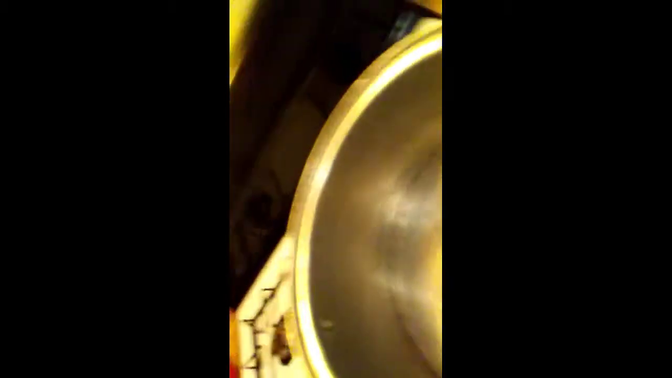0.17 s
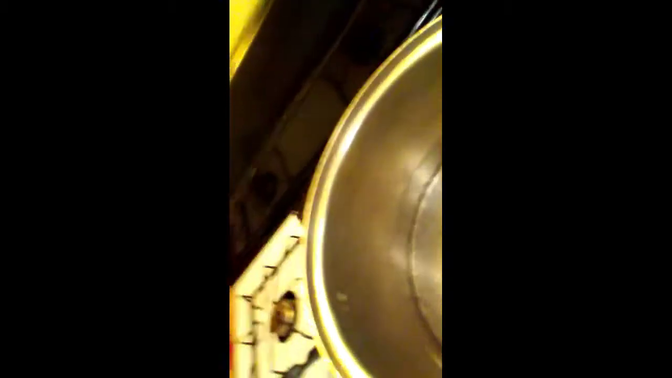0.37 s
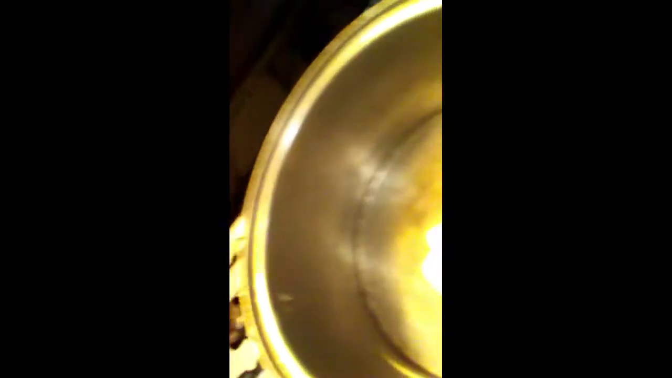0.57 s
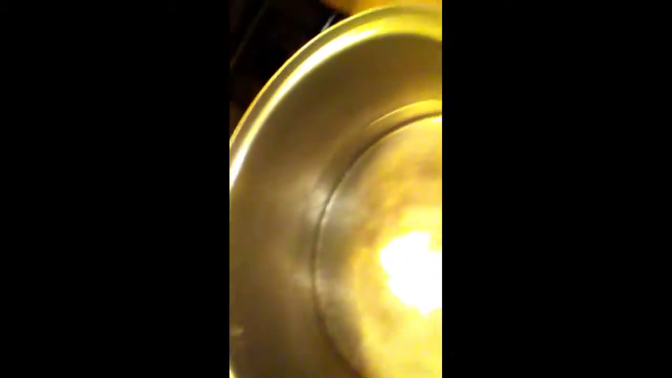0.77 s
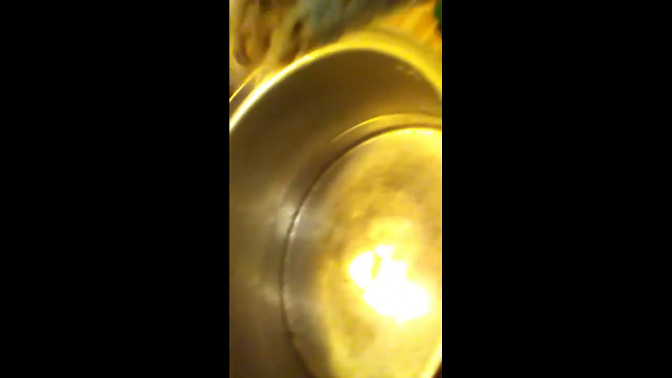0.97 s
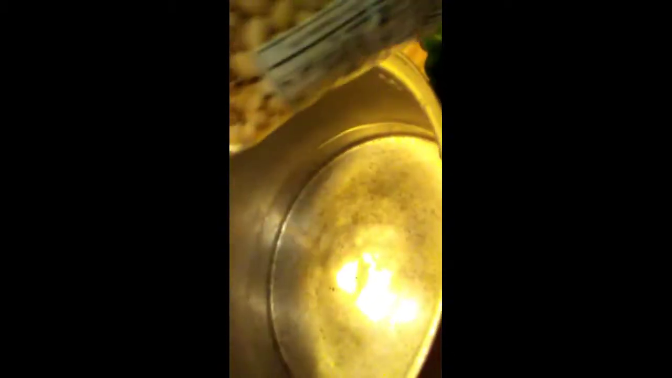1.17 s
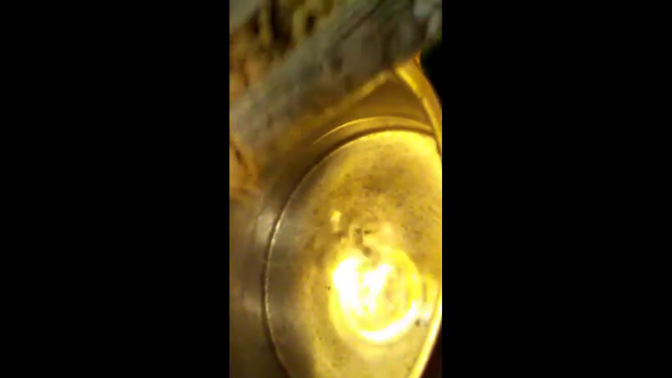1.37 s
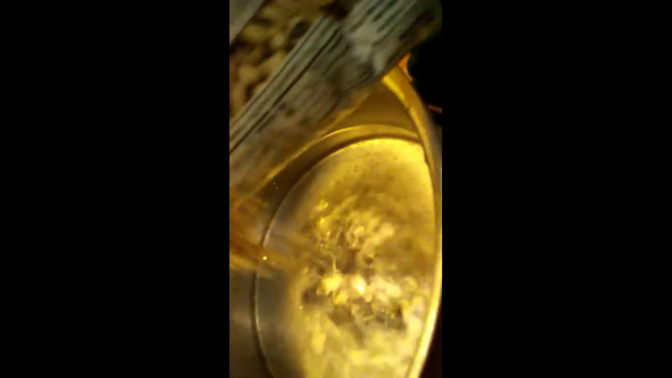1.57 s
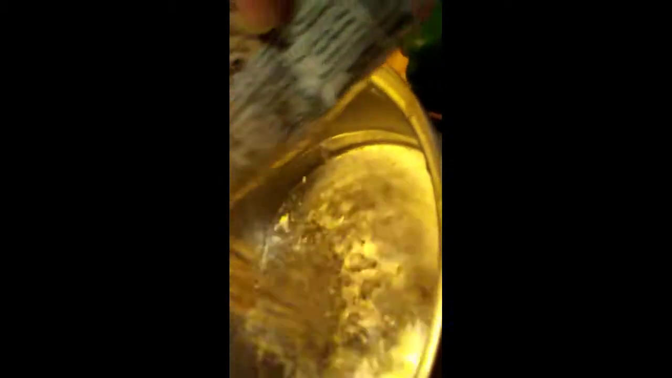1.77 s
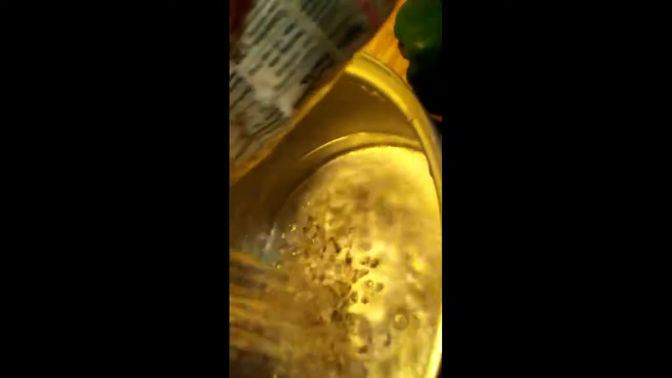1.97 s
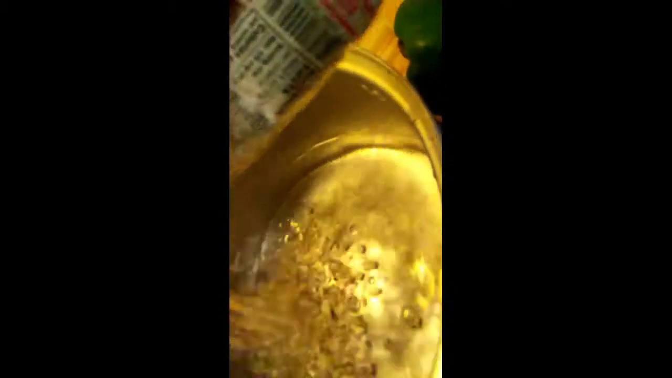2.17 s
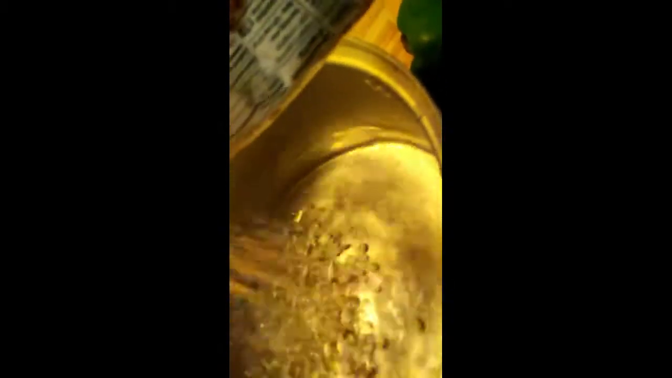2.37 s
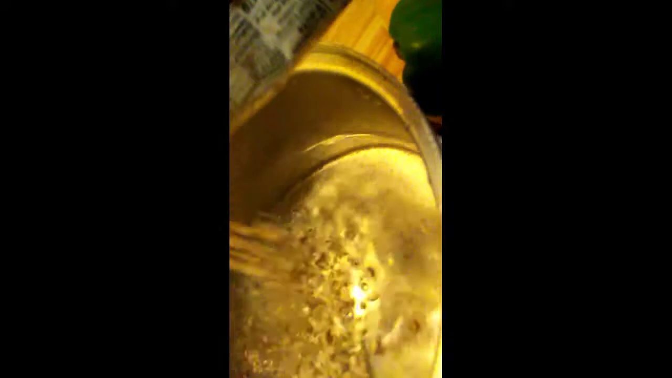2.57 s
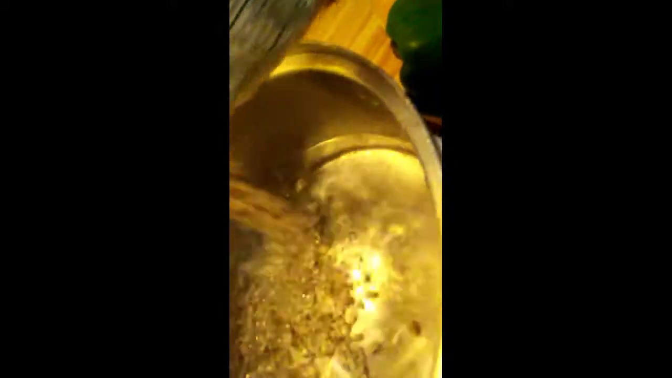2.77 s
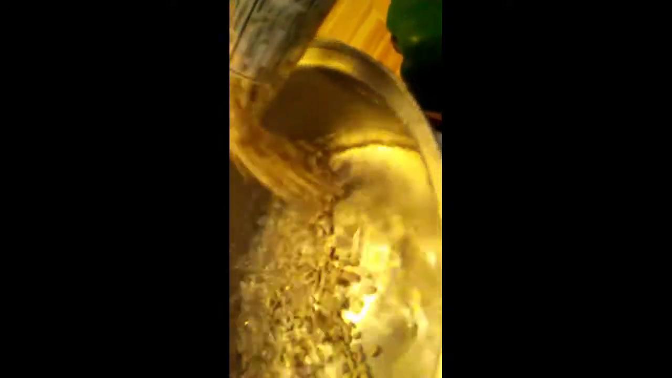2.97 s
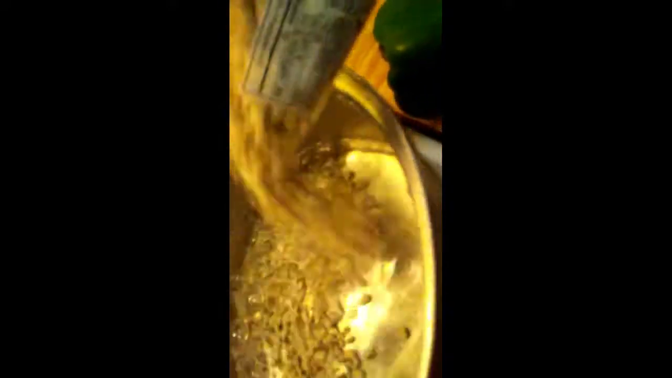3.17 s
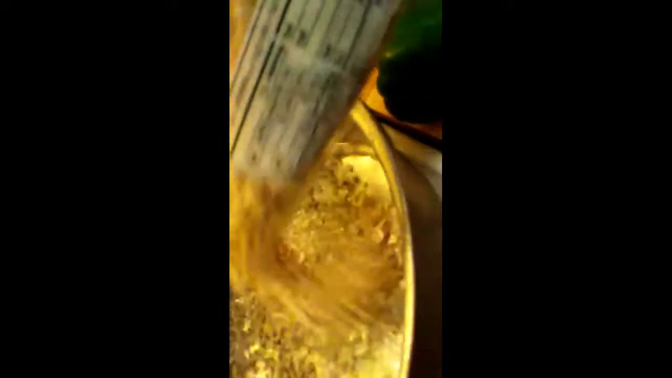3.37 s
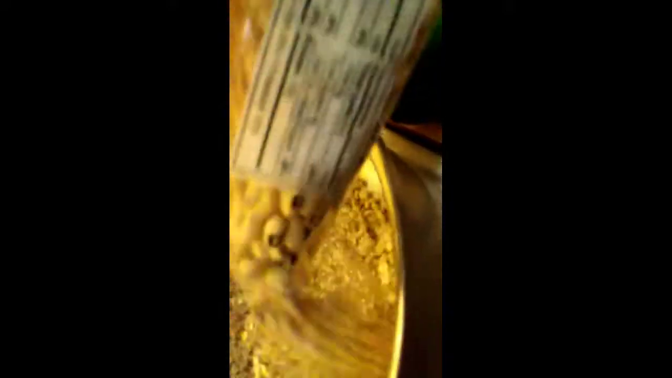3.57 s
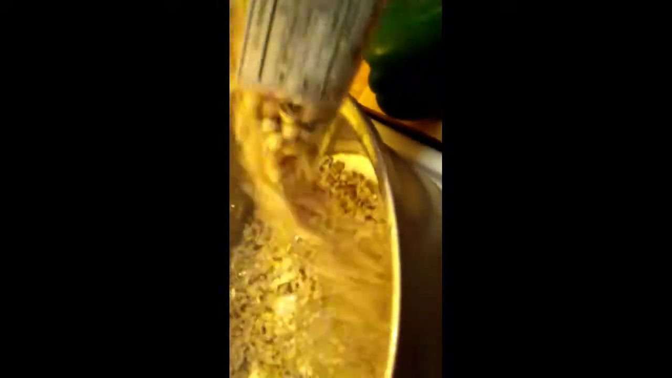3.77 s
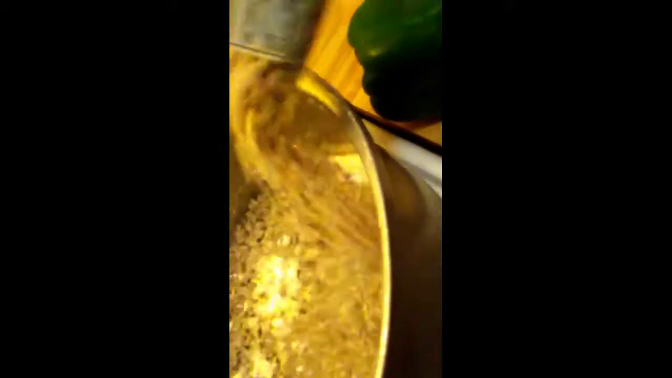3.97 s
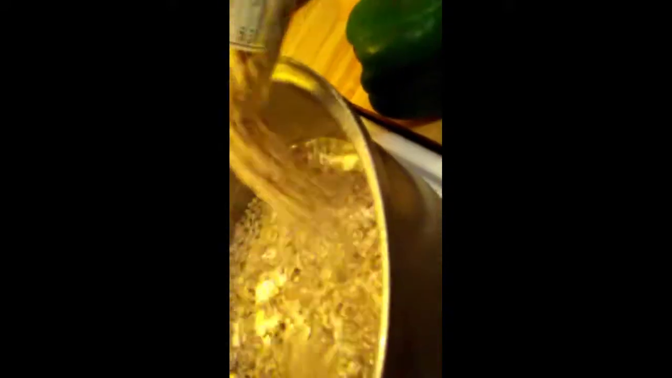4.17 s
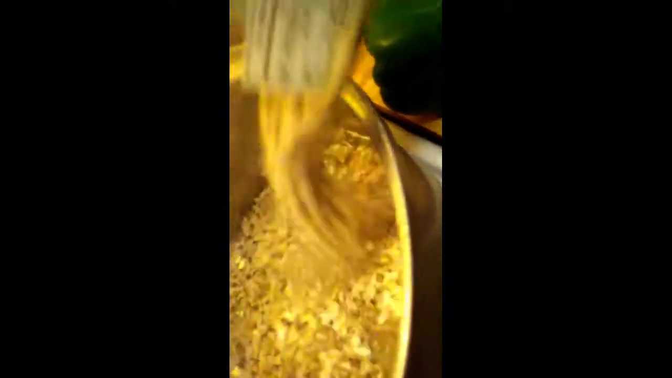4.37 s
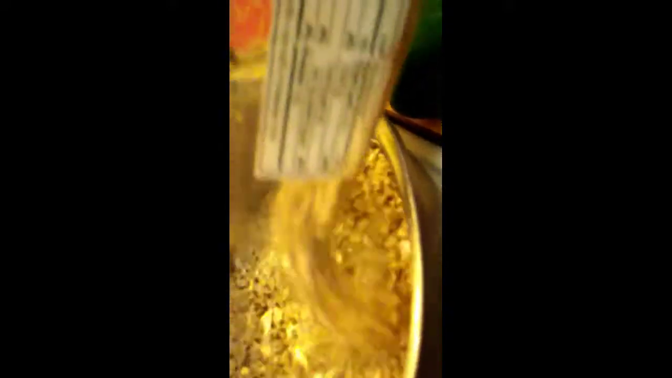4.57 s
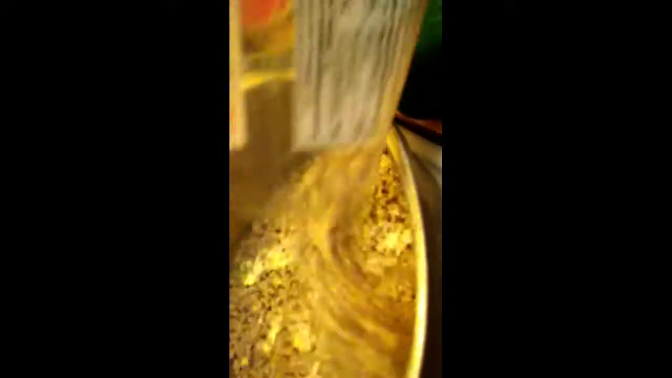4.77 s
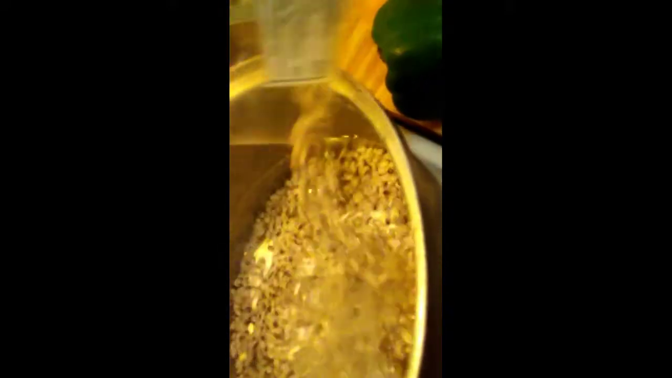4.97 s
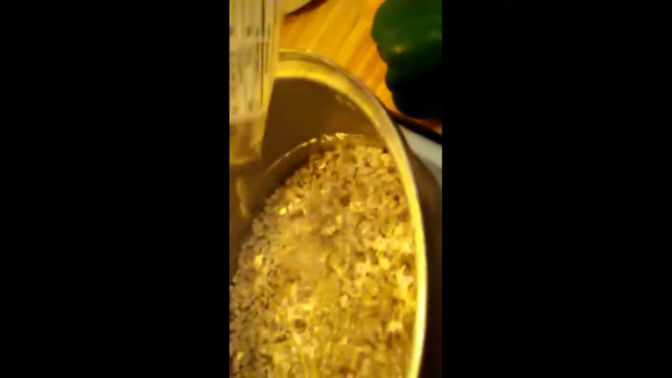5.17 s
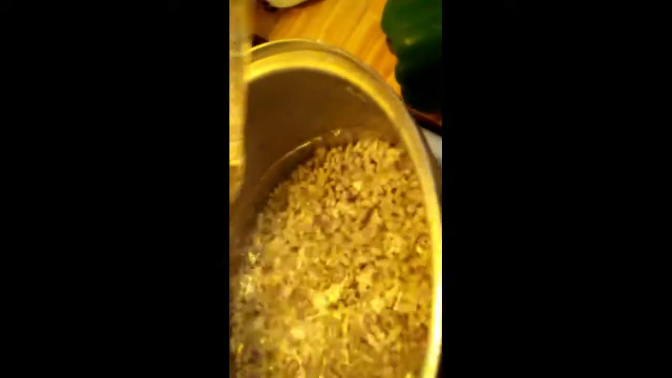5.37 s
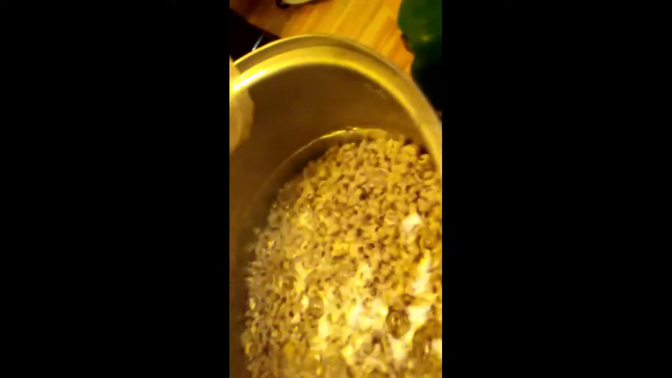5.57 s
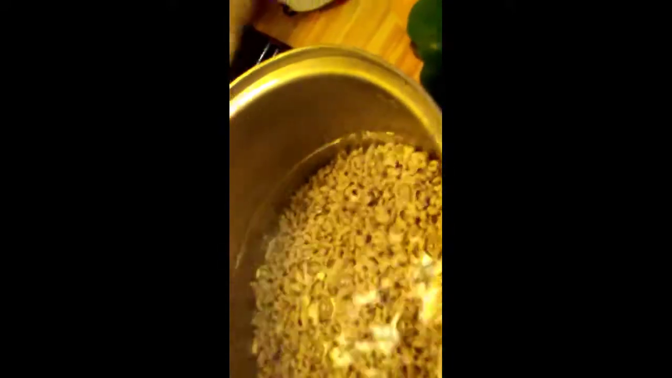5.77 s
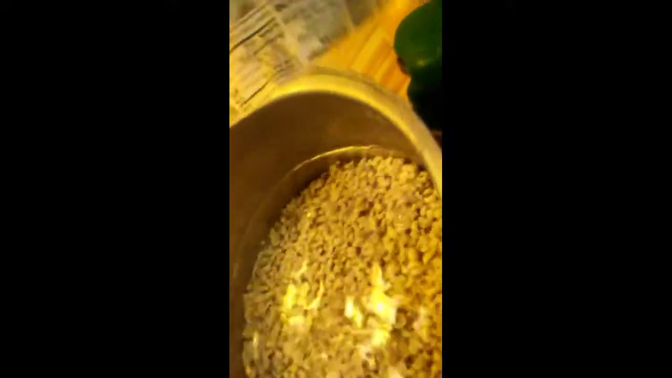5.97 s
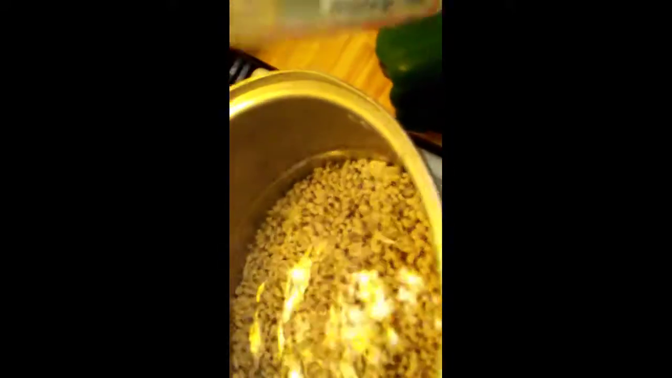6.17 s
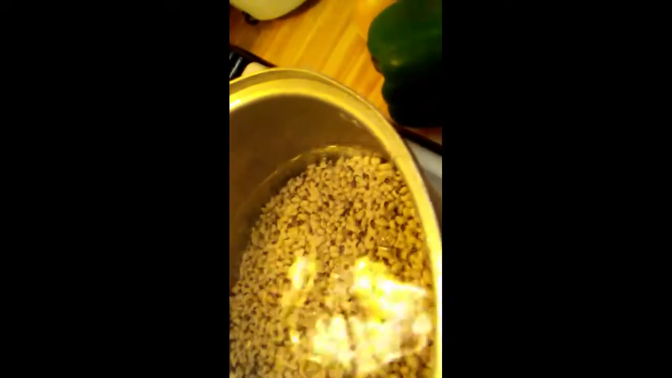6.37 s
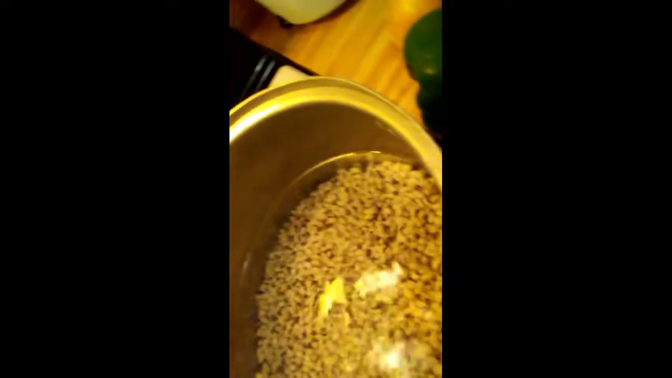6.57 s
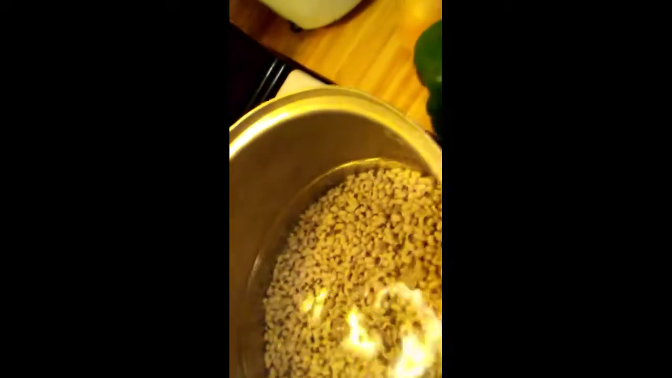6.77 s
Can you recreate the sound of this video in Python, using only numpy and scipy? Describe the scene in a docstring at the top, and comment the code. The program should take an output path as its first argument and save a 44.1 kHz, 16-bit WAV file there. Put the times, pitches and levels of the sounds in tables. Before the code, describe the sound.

A plastic bag crackles, then dried beans clatter into a bare steel pot, ringing at first and dulling as they pile up, before more crackling.

```python
"""In a small kitchen, dried beans pour from a plastic bag into an empty steel pot, close to the microphone.
The bag crackles as it is tipped and lifted away: short filtered noise bursts, one for each crease.
Beans ping on the bare steel and set the pot ringing (noise bursts plus fading tones), then patter more
dully on the growing heap. A fan hums behind: filtered noise and wavering tones."""
import sys
import numpy as np
from scipy import signal
from scipy.io import wavfile
from scipy.ndimage import uniform_filter1d

SR = 44100
rng = np.random.default_rng(int(sys.argv[2]) if len(sys.argv) > 2 else 0)


def digitize_waveform(pressure):
    """Quantize a signal to 16-bit integers and store it at the path in sys.argv[1].

    Rows of a 2-D input are taken as channels; values are limited to [-1, 1].
    """
    field = np.atleast_2d(pressure).T
    bounded = np.clip(field, -1, 1)
    quanta = np.round(bounded * 32767).astype(np.int16)
    wavfile.write(sys.argv[1], SR, quanta)


N = 300762  # length in samples, about 6.8 s

# t60 is the time to fade by 60 dB. Levels are relative: the functions below trim them further.
# Soft air noise of the kitchen: [f/Hz, level/dB per Hz]
AIR_SPECTRUM = [(20, -57.5), (64, -27), (123, -37), (208, -13.5), (243, -15.5), (275, -18.5), (332, -4),
                (375, -17), (700, -21.5), (1870, -30), (3880, -33.5), (4660, -57), (7000, -44.5),
                (15500, -43)]
AIR_DB = -46.5  # before the trim in fan()
# Tones of the fan: [f/Hz, level/dB]
FAN_TONES = [(241.5, -53), (333.5, -54.5), (414, -60.5)]
# How long the kitchen echoes at each pitch: [f/Hz, t60/s]
ROOM_DECAY = [(200, 0.73), (2000, 0.27), (7000, 0.24), (15000, 0.23)]
# The bag flexes as it is tipped, emptied and lifted; a negative fall means the level goes on creeping up:
# [peak t/s, body level/dB, treble level/dB, rise/dB per s, fall/dB per s]
BAG_FLEXES = [(.33, -49, -61.5, 156, 1), (.7, -35, -43.5, 185, 67), (.99, -27, -36.5, 87, 43.5),
              (5.39, -32.5, -44.5, 133.5, 52), (6.608, -42, -53.5, 55, -1)]
# The loudest creases of the bag snapping:
# [t/s, body level/dB, crack level/dB, body f/Hz, crack f/Hz, t60/s]
BAG_SNAPS = [(0.31, -45, -49, 3500, 7280, 0.026), (0.386, -42.5, -46, 2070, 7800, 0.062),
             (.436, -37.5, -50, 2300, 7700, 0.02), (0.512, -49, -42, 2590, 6500, 0.02),
             (0.5173, -37, -55, 1800, 8200, 0.011), (0.6206, -39, -46, 1800, 6370, 0.075),
             (0.6541, -25, -20.5, 2750, 5700, 0.033), (0.678, -21, -27, 1820, 5700, 0.014),
             (0.7305, -30, -27.5, 2690, 6700, 0.018), (.84, -36, -55, 1760, 7200, 0.009),
             (0.8806, -26.5, -20, 2840, 9900, 0.018), (0.986, -23.5, -26.5, 2000, 6600, 0.023),
             (1.0484, -31, -33, 880, 6370, 0.022), (1.2265, -30, -44, 1660, 7000, 0.012),
             (1.5643, -29.5, -13, 1790, 5900, 0.018), (5.163, -42, -30, 3700, 12500, 0.015),
             (5.172, -25.5, -29, 1770, 7250, 0.02), (5.3495, -37, -48, 1500, 7500, .015),
             (5.3546, -18, -35.5, 1900, 8400, 0.022), (5.368, -22, -40, 1620, 7500, 0.058),
             (5.3815, -27.5, -37, 1740, 6800, 0.037), (5.3989, -33, -28.5, 1870, 6750, 0.031),
             (5.408, -32, -36, 1960, 6460, 0.022), (5.4381, -19, -32, 1740, 7000, 0.022),
             (5.4505, -39, -24, 1590, 6700, 0.014), (5.5781, -34.5, -59, 1290, 7040, 0.0086),
             (5.665, -37, -59, 1840, 7300, .014), (5.6755, -26, -37, 1710, 7300, 0.034),
             (5.82, -34, -61, 2080, 7320, 0.024), (5.829, -35.5, -55, 1100, 7900, 0.057),
             (6.1661, -28.5, -48, 1770, 5790, 0.022), (6.1726, -29, -36, 1820, 5830, 0.047),
             (6.1843, -22, -32, 2150, 6440, 0.0092), (6.1982, -31, -51, 2110, 5800, 0.025),
             (6.2352, -21.5, -22.5, 1970, 5360, 0.012), (6.4315, -52, -49.5, 2350, 8700, 0.0066),
             (6.459, -40.5, -54, 950, 7560, 0.0076), (6.542, -32, -48, 2110, 6440, 0.033),
             (6.566, -21.5, -30, 2320, 6000, 0.019), (6.5929, -30, -41, 1550, 7760, 0.055),
             (6.6482, -56, -36, 1570, 7470, 0.015), (6.6866, -50, -37.5, 1590, 7700, 0.018),
             (6.722, -48, -37, 2520, 8050, 0.018), (6.742, -48, -41, 2000, 6650, .012),
             (6.7495, -33.5, -45, 1820, 7700, 0.021)]
# Sound colour of the bag's film: [f/Hz, level/dB per Hz]
FILM_BODY = [(130, -24), (250, -1), (450, 2), (750, 1.5), (1900, 6.5), (3000, 4.5), (4000, -4),
             (4600, -30.5), (6000, -56)]
# Sound colour of the bag's bright crack: [f/Hz, level/dB per Hz]
FILM_CRACK = [(4000, -55), (4900, -16.5), (5900, -6), (7200, -2), (9500, -7.5), (11500, -16),
              (15300, -19.5)]
# Ways the pot rings (its modes), before the beans damp and detune them: [f/Hz, level/dB, t60/s]
POT_MODES = [(416.5, -8, 0.61), (463.4, -6, 0.55), (798, -3, 0.095), (878, 3, 0.12), (983, 8.5, 0.13),
             (1067, 7, 0.095), (1474, 3.5, 0.32), (1548, 4, 0.19), (1747, 10, 0.096), (1903, 11.5, 0.094),
             (2360, 11, 0.16), (2860, 3.5, 0.17), (5795, 10, 0.099), (6000, 5.5, 0.3), (6860, 11.5, 0.098),
             (6900, 17.5, 0.1), (7800, 14.5, 0.089), (8490, 10, 0.12)]
# Sound colour of a bean on steel: [f/Hz, level/dB per Hz]
STEEL_KNOCK = [(40, -31), (75, -26), (125, -36.5), (200, -14.5), (400, 4.5), (610, -3.5), (900, 4.5),
               (1200, 1), (1600, 0.5), (2400, 3), (3200, -1), (4000, 0.5), (4700, -8.5), (6000, -48)]
# Sound colour of a bean on the heap: [f/Hz, level/dB per Hz]
HEAP_KNOCK = [(40, -41), (120, -27.5), (200, -11), (420, 1.5), (620, -5), (980, -5.5), (1250, -2),
              (1650, 7.5), (2350, 6.5), (2700, 1.5), (3400, -1), (3950, -1.5), (4450, -26), (5200, -50)]
# Sound colour of a bean's bright ping: [f/Hz, level/dB per Hz]
BEAN_PING = [(3000, -71), (4700, -11), (5500, 1), (6300, 4), (7100, 5), (8400, -0.5), (9400, -0.5),
             (10300, 1.5), (11500, -8), (13500, -11), (15300, -9)]
# Beans that hit the pot hard, from dead clacks to ringing pings:
# [t/s, body level/dB, ping level/dB, body f/Hz, ping f/Hz, ping t60/s]
HARD_HITS = [(1.363, -32, -15, 1640, 6700, 0.041), (1.4198, -22.5, -7.5, 2240, 8060, 0.049),
             (1.4866, -22, -13.5, 1480, 8200, 0.06), (1.59, -35, -21, 1530, 7760, 0.063),
             (1.6037, -39, -15, 1440, 7800, 0.023), (1.6295, -27, -31, 1530, 6910, 0.03),
             (1.64, -22.5, -17.5, 1590, 7700, 0.11), (1.6845, -22.5, -12, 2320, 8240, 0.099),
             (1.7077, -33, -11, 2320, 6500, 0.077), (1.7302, -28, -8, 2280, 6700, .032),
             (1.7528, -25.5, -14, 3740, 6650, 0.032), (1.7746, -23.5, -10, 2200, 6640, 0.076),
             (1.8527, -24, -15.5, 2430, 6030, 0.069), (1.91, -21, -17, 1480, 6600, 0.0086),
             (2.003, -32, -13, 2410, 5900, 0.016), (2.0575, -44, -13.5, 2330, 6060, 0.019),
             (2.234, -20, -11.5, 2070, 6260, 0.0092), (2.4019, -23, -18.5, 1640, 6440, 0.015),
             (2.4538, -16, -18, 1490, 8600, 0.04), (2.468, -24, -10.5, 1900, 4800, 0.011),
             (2.481, -19, -15.5, 2450, 6220, 0.052), (2.5166, -14, -16, 2370, 6400, 0.056),
             (2.572, -21.5, -28, 990, 7380, 0.016), (2.5795, -27, -9.5, 1390, 6800, 0.021),
             (2.587, -37, -15, 2260, 7100, 0.013), (2.665, -18.5, -13, 2700, 5200, 0.034),
             (2.6854, -23, -19.5, 990, 8050, 0.0075), (2.7498, -20.5, -23, 870, 6960, 0.0064),
             (2.786, -24, -42, 2880, 6930, 0.019), (2.801, -17, -40, 980, 7000, 0.087),
             (2.8091, -16.5, -8, 1970, 7040, 0.035), (2.8317, -18, -36, 3170, 7400, 0.055),
             (2.8562, -21, -12, 1070, 7250, 0.03), (2.9062, -22, -20, 1420, 9900, 0.01),
             (2.9453, -26, -10.5, 1010, 8440, 0.031), (3.0452, -21.5, -20, 1840, 6120, 0.02),
             (3.074, -23, -9, 910, 5650, 0.04), (3.0945, -18, -13, 2170, 6500, 0.03),
             (3.195, -21.5, -11.5, 1810, 6600, 0.04), (3.2613, -20, -15, 1710, 6860, 0.039),
             (3.3215, -20.5, -17.5, 1800, 7060, 0.1), (3.4272, -31, -14.5, 1930, 7050, .025),
             (3.5645, -23.5, -13.5, 1690, 7150, 0.019), (3.657, -23, -19, 3320, 6800, 0.034),
             (3.6932, -25.5, -32, 3340, 7000, .02), (3.7444, -19, -19.5, 2120, 6040, 0.028),
             (3.7921, -21, -17.5, 3320, 7150, 0.067), (3.867, -22, -25, 2780, 7190, 0.018),
             (3.9168, -30, -17, 1830, 7060, 0.062), (4.0482, -19, -19, 3290, 7710, 0.046),
             (4.0767, -14.5, -25, 2250, 7250, 0.004), (4.142, -45, -18.5, 1480, 7150, 0.028),
             (4.495, -20, -13.5, 2240, 7260, 0.032), (4.54, -28, -13, 2820, 7500, 0.045),
             (5.1509, -24.5, -60, 1090, 7750, .06), (5.163, -30.5, -37, 3800, 9700, 0.03),
             (5.1838, -21.5, -30, 2350, 7700, 0.056), (5.2298, -33.5, -44, 2400, 7400, 0.027),
             (5.265, -34, -38, 920, 8600, 0.018)]
# The stream of beans swells, runs steadily and dries up: [t/s, clatter level/dB, ping level/dB]
BEAN_STREAM = [(1.34, -39.5, -48), (1.45, -31, -43.5), (1.66, -25.5, -25), (1.76, -20.5, -14),
               (2.06, -21.5, -25), (2.32, -21.5, -21), (2.44, -26.5, -32), (2.5, -24, -22.5),
               (3.0, -23, -25.5), (3.28, -22.5, -21), (3.9, -20.5, -24.5), (4.58, -18.5, -22),
               (4.98, -19, -32), (5.12, -28, -45.5), (5.24, -35, -39), (5.3, -50, -84)]

# Beans cover a first share of the pot's bottom; later the heap spreads at a steady rate.
# HEAP_SPREAD_S is the time that rate would need for the whole bottom.
FIRST_COVER, HEAP_START_S, HEAP_SPREAD_S = 0.24, 3.254, 0.99
BODY_LASTS = 2.7  # a hard hit's body lasts this many times as long as its ping
# A hard hit rattles: typical gap, level change per bounce, bounce length against the first ping
REBOUND_S, REBOUND_DB, REBOUND_LASTS = 0.011, -5, 0.57
SPLIT_HZ = 4500  # pot modes below this clang, those above it shimmer
EDGE_HZ = 15600  # upper limit of the sound
TIME = np.arange(N) / SR  # seconds
RING = np.arange(8192) / SR  # seconds since a single blow


def amp(db):
    """Turns decibels into a gain."""
    return 10 ** (np.asarray(db) / 20)


def unit(x, span=None):
    """Scales a sound to an average (rms) level of 1, judged over its first span seconds."""
    part = x if span is None else x[:round(span * SR)]
    return x / np.sqrt(np.mean(part ** 2) + 1e-20)


def read(points, hz):
    """Reads a table between its points, on a log-frequency axis."""
    f, value = np.transpose(points)
    return np.interp(np.log(hz + 1), np.log(f + 1), value)


def levels(rows):
    """Gain curves from rows of (t/s, level/dB, ...), practically silent outside the rows."""
    s, *columns = np.transpose(rows)
    return [amp(np.interp(TIME, s, db, left=-120, right=-120)) for db in columns]


def add(mix, s, sound):
    """Mixes a sound in at time s."""
    part = mix[round(s * SR):][:len(sound)]
    part += sound[:len(part)]


def colour(x, points, hz=1000, width=1, lift_db=0):
    """Filters a sound to the given spectrum; if lift_db is above 0, a resonance at hz stands out."""
    f = abs(np.fft.fftfreq(2048, 1 / SR))
    bump = 1 / (1 + ((f - hz) / width) ** 2) ** 2 * (lift_db > 0)
    gain = amp(read(points, f)) * np.sqrt(1 + amp(lift_db) ** 2 * bump)
    # minimum phase: the filter answers at once and never ahead of the sound
    response = np.exp(np.conj(signal.hilbert(np.log(gain))))
    taps = np.fft.ifft(response).real
    return signal.fftconvolve(x, taps)[:len(x)]


def burst(t60, rise=0.00013, contact=0.98, contact_s=0.00028):
    """The brief jolt of contact, then countless close modes dying together, all as noise."""
    shape = amp(-60 * RING / t60) + contact * np.exp(-RING / contact_s)
    return rng.standard_normal(len(RING)) * shape * (1 - np.exp(-RING / rise))


def grains(spectrum, t60, low_hz, high_hz, width_hz, lift_db, count=32):
    """A set of short knocks, each with its own resonance between low_hz and high_hz."""
    pitches = np.linspace(low_hz, high_hz, num=count)
    return [unit(colour(burst(t60), spectrum, hz, width_hz, lift_db)) for hz in pitches]


def impacts(per_s, spread_db):
    """Random blows of uneven size: rows of (t/s, size, place 0-1)."""
    chance, strength, place = rng.random((3, N))
    hit = chance < per_s / SR
    size = amp(spread_db * np.minimum(-np.log(1 - strength[hit]), 3.2))
    return np.transpose([TIME[hit], size, place[hit]])


def play(blows, sounds, span):
    """Each blow makes the sound of its place; the sum is held near rms 1, averaged over about span s."""
    x = np.zeros(N)
    for s, size, place in blows:
        add(x, s, size * sounds[int(place * len(sounds))])
    width = int(span * SR)
    power = uniform_filter1d(uniform_filter1d(x ** 2, width), width)
    return x / np.sqrt(abs(power) + .01 * np.mean(x ** 2))  # the small extra keeps gaps quiet


def fan(air_db=-5, tones_db=-2, waver=0.79):
    """Soft air noise with a few tones that waver in strength and phase."""
    knots = np.linspace(0, TIME[-1], num=90)
    out = amp(AIR_DB + air_db) * unit(colour(rng.standard_normal(N), AIR_SPECTRUM))
    for hz, db in FAN_TONES:
        wander = rng.standard_normal(len(knots)) + 1j * rng.standard_normal(len(knots))
        drift = np.interp(TIME, knots, wander)
        tone = ((1 + waver * drift) * np.exp(2j * np.pi * hz * TIME)).real
        out += amp(db + tones_db) * unit(tone)
    return out


def kitchen(x, delay=.005):
    """Echoes from the room blur into a short tail of fading noise, the treble dying first."""
    hz, t, z = signal.stft(rng.standard_normal(SR // 2), SR, nperseg=256)
    fade = amp(-60 * t / read(ROOM_DECAY, hz)[:, None])
    tail = signal.istft(z * fade, SR, nperseg=256)[1]
    tail = np.r_[np.zeros(int(delay * SR)), tail]
    return signal.fftconvolve(x, tail / np.linalg.norm(tail))[:N]


def rustle(body_db=-5.0, treble_db=-3):
    """Many tiny creases give way as each flex of the bag builds up and relaxes."""
    s, low_db, high_db, rise, fall = np.transpose(BAG_FLEXES)[:, :, None]
    below_peak = np.maximum(rise * (s - TIME), fall * (TIME - s))
    # at each moment the strongest flex sets the level
    body = amp((low_db - below_peak).max(0))
    treble = amp((high_db - below_peak).max(0))
    creases = impacts(per_s=850, spread_db=2.5)
    low = play(creases, grains(FILM_BODY, 0.016, 1550, 1900, 200, 4.5, count=20), 0.14)
    high = play(creases, grains(FILM_CRACK, 0.018, 6000, 10000, 900, 4, count=20), 0.074)
    return amp(body_db) * body * low + amp(treble_db) * treble * high


def snaps(body_db=0.0, crack_db=-2, crack_q=4.8):
    """A crease buckles with a sharp jolt and the film around it rings very briefly, at its own pitch."""
    out = np.zeros(N)
    for s, low_db, high_db, body_hz, crack_hz, t60 in BAG_SNAPS:
        body = colour(burst(t60, 0.00021), FILM_BODY, body_hz, 270, 7.3)
        crack = colour(burst(t60, contact=1.6), FILM_CRACK, crack_hz, crack_hz / crack_q, 10.7)
        body = amp(low_db + body_db) * unit(body, .008)
        crack = amp(high_db + crack_db) * unit(crack, .008)
        add(out, s, body + crack)
    return out


def pot_modes(rise=0.00047, damping=0.55, detune=0.0241):
    """The pot's modes build up as the blow spreads; beans on the steel damp and slightly detune them."""
    hz, db, t60 = np.transpose(POT_MODES)[:, :, None]
    shape = amp(db - 60 * RING / (t60 * damping)) * (1 - np.exp(-RING / rise))
    loaded_hz = hz * (1 + detune * rng.standard_normal(hz.shape))
    return hz[:, 0], shape * np.exp(2j * np.pi * loaded_hz * RING)


def shifting_modes(count=18):
    """The pot's modes under several different loads of beans, as one long list."""
    loads = [pot_modes() for _ in range(count)]
    return [np.concatenate(part) for part in zip(*loads)]


def ring(waves, weights):
    """The pot struck at one place: each mode gets its own strength and a random phase."""
    turns = np.exp(2j * np.pi * rng.random(len(weights)))
    return unit(((weights * turns)[:, None] * waves).real.sum(0))


def strikes(body_db=-2, treble_db=-3.5, modes_db=3, ping_modes_db=-4, ringing_t60=0.063, count=3):
    """A hard hit pings and rattles, and the steel sings near the struck pitch; a dead clack barely stirs it."""
    out = np.zeros(N)
    hz, waves = pot_modes(detune=0.0026)
    for s, low_db, high_db, body_hz, ping_hz, t60 in HARD_HITS:
        lively = t60 / ringing_t60  # a longer ping stirs the pot more
        near = (hz < SPLIT_HZ) / (1 + ((hz - body_hz) / 170) ** 2)
        near_ping = (hz > SPLIT_HZ) / (1 + ((hz - ping_hz) / 700) ** 2)
        body = unit(colour(burst(BODY_LASTS * t60, 0.00033), STEEL_KNOCK, body_hz, 210, 18))
        body = body + amp(modes_db) * lively * near.max() * ring(waves, near)

        # the first ping, then its bounces
        lengths = [t60] + [REBOUND_LASTS * t60] * (count - 1)
        hits = [colour(burst(length, length / 95), BEAN_PING, ping_hz, 940, 15.2) for length in lengths]
        ping, *bounces = (unit(hit, 0.0074) for hit in hits)
        ping = ping + amp(ping_modes_db) * lively * unit(ring(waves, near_ping), 0.0064)
        ping_gain_db = high_db + treble_db
        add(out, s, amp(low_db + body_db) * unit(body, .025) + amp(ping_gain_db) * ping)
        landings = s + np.cumsum(REBOUND_S * (.5 + rng.random(len(bounces))))
        for k, (at, bounce) in enumerate(zip(landings, bounces), 1):
            add(out, at, amp(ping_gain_db + k * REBOUND_DB) * lively * bounce)
    return out


def cover(s):
    """Share of the pot's bottom that lies under beans at time s."""
    return np.clip(FIRST_COVER + np.maximum(s - HEAP_START_S, 0) / HEAP_SPREAD_S, 0, 1)


def thinned(blows, flow, full_db=-21, power=.8):
    """A weaker stream brings fewer beans: below full flow, only a share of the blows happens."""
    share = (np.interp(blows[:, 0], TIME, flow) / amp(full_db)) ** power
    chance = rng.random(N)[(blows[:, 0] * SR).astype(int)]
    return blows[chance < share]


def knocks(spectrum, t60, low_hz, high_hz, tone_t60, tone_db, count=48):
    """A set of beans landing: a dry tap and one clean dying tone each, from low_hz to high_hz."""
    pitches = np.linspace(low_hz, high_hz, num=count)[:, None]
    tones = np.sin(2 * np.pi * pitches * RING) * amp(-60 * RING / tone_t60)
    return [colour(unit(burst(t60)) + amp(tone_db) * unit(tone), spectrum) for tone in tones]


def pour(clatter_db=-2.0, ping_db=-2.0, modes_db=-6.5, ping_modes_db=-8, heap_modes_db=-5):
    """Beans ring the steel, high and low at once; as the heap grows they knock on each other instead."""
    clatter, ping = levels(BEAN_STREAM)
    bare, soft = np.sqrt(1 - cover(TIME)), np.sqrt(cover(TIME))
    on_steel = thinned(impacts(per_s=450, spread_db=4.0), clatter)
    on_heap = thinned(impacts(per_s=950, spread_db=2.0), clatter)
    steel = play(on_steel, knocks(STEEL_KNOCK, 0.038, 595.6, 4260, 0.075, -8.5), 0.54)
    pings = play(on_steel, grains(BEAN_PING, 0.026, 4700, 9030, 760, 16.5), 0.56)
    heap = play(on_heap, knocks(HEAP_KNOCK, 0.041, 194, 4096, 0.038, -7), 0.05)
    ticks = play(on_heap, grains(BEAN_PING, 0.024, 6530, 8960, 530, 12.7), 0.15)

    # a bean stirs only the modes that move where it lands, so each mode flares up at its own moments
    hz, waves = shifting_modes()
    clang = play(impacts(per_s=340, spread_db=0.9), waves[hz < SPLIT_HZ].imag, 0.37)
    shimmer = play(impacts(per_s=90, spread_db=3.0), waves[hz > SPLIT_HZ].imag, 0.19)
    low = bare * (steel + amp(modes_db) * clang) + soft * (heap + amp(heap_modes_db) * clang)
    high = bare * pings + soft * ticks + amp(ping_modes_db) * shimmer
    return amp(clatter_db) * clatter * low + amp(ping_db) * ping * high


def scene(pot_room_db=-10, bag_room_db=-9.5):
    """Pot and bag near the microphone, with the room and the fan around them."""
    pot = pour() + strikes()
    bag = snaps() + rustle()
    room = kitchen(amp(pot_room_db) * pot + amp(bag_room_db) * bag)
    return (pot + bag + room + fan())[None]


def record(dry):
    """Cuts off any peaks beyond full scale, then removes the sound above EDGE_HZ."""
    low_pass = signal.firwin(511, EDGE_HZ, window=("kaiser", 9), fs=SR)[None]
    return signal.oaconvolve(np.clip(dry, -1, 1), low_pass, "same")


dry = scene()
out = record(dry)
digitize_waveform(out)
```